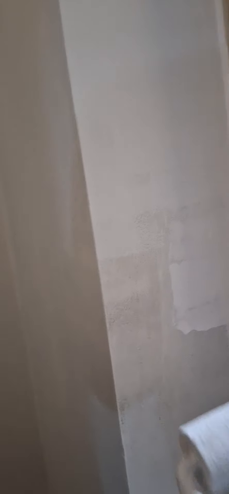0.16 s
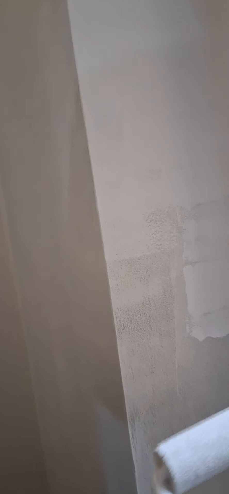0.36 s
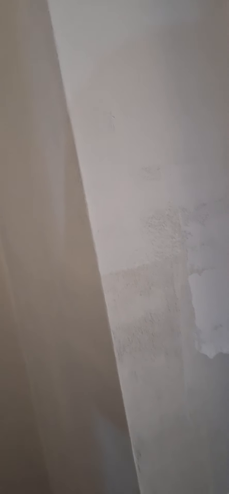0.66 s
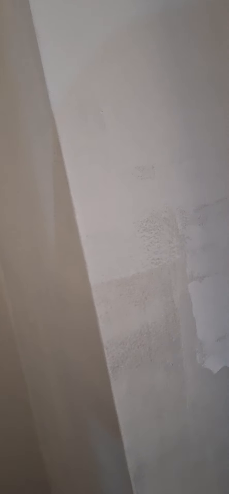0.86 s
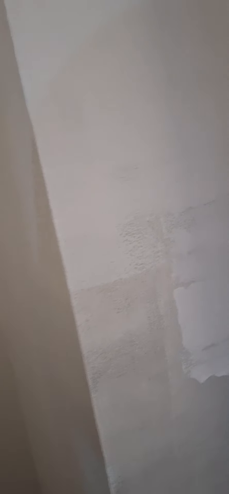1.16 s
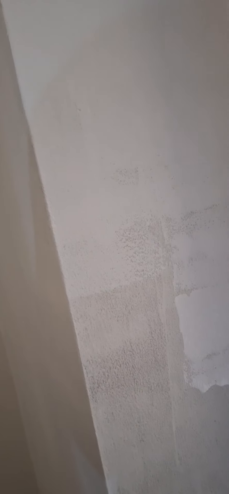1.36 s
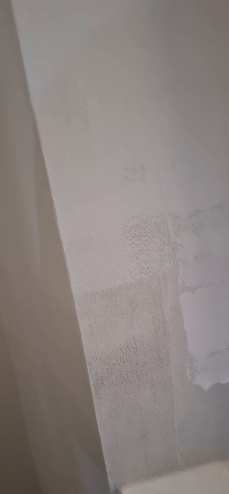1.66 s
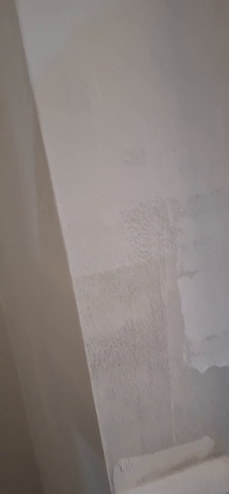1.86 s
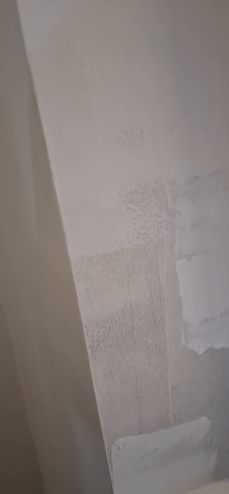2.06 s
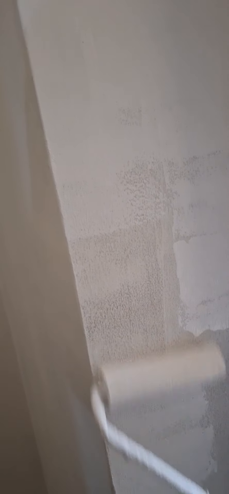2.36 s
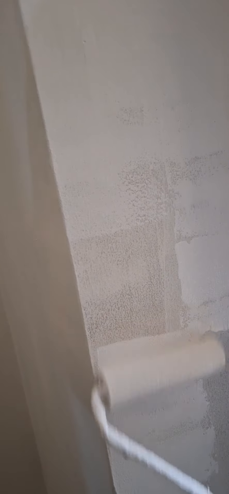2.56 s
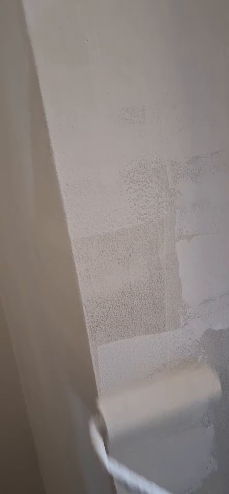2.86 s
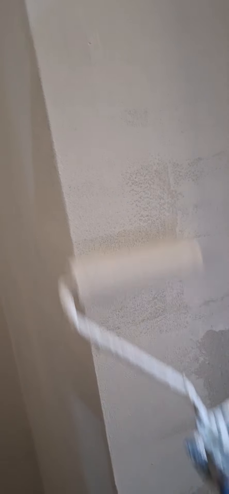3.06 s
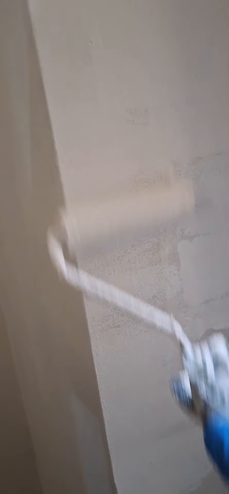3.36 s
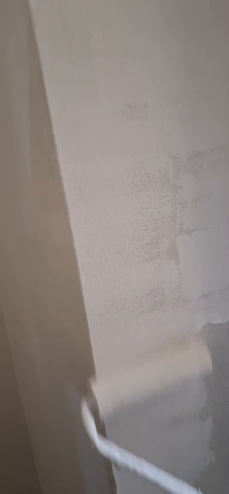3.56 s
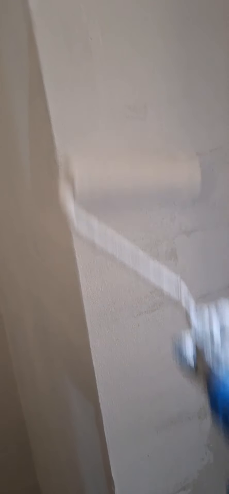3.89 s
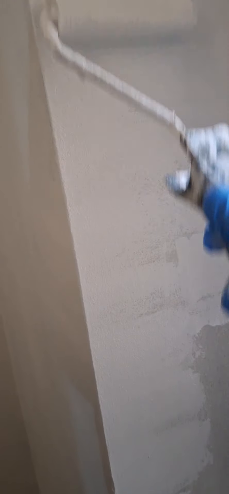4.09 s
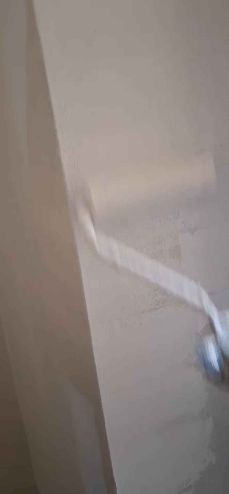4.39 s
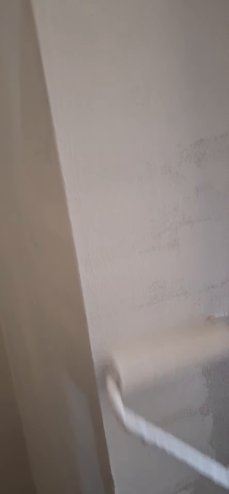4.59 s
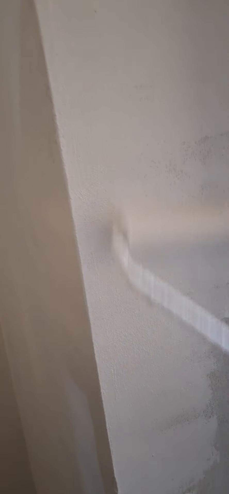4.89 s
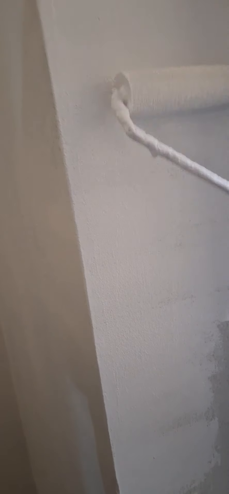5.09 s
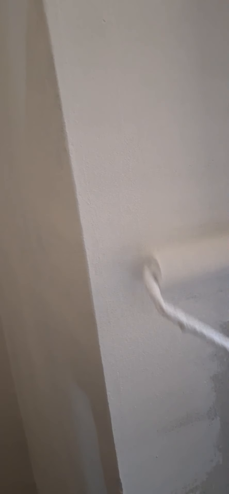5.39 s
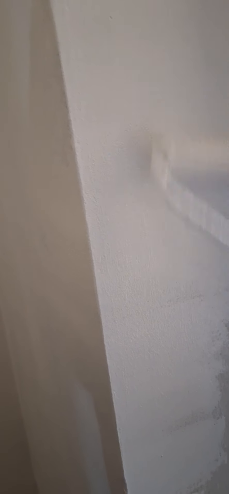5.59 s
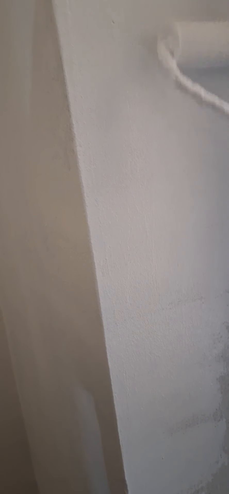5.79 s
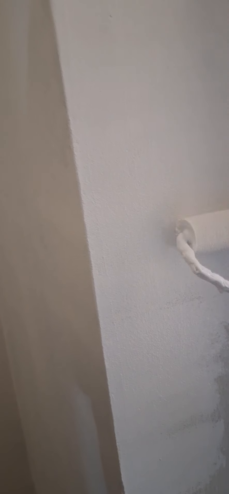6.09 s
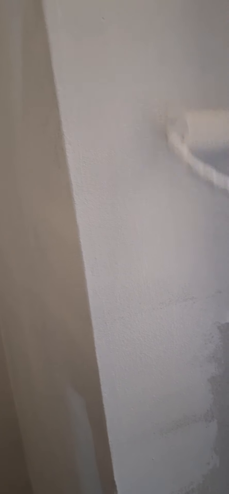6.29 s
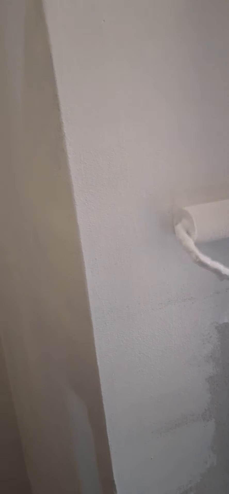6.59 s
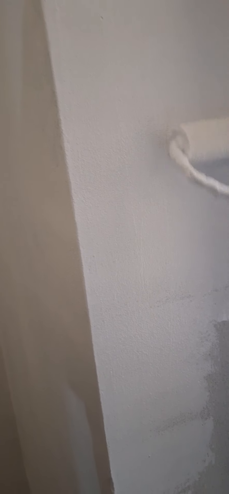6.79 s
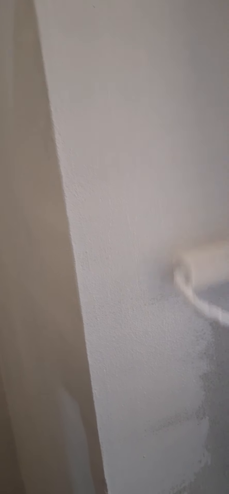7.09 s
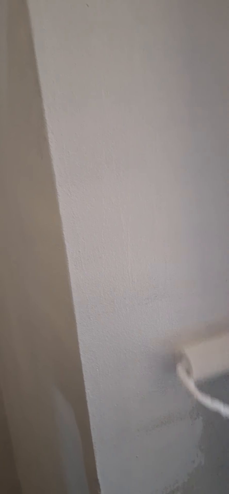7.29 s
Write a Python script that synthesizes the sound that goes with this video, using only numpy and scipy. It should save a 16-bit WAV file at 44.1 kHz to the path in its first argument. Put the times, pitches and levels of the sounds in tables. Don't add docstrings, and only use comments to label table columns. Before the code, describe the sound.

In a bare room, a roller touches a wall, pauses, then rolls back and forth with bright tacky crackling, quick turns and faint low bumps.

```python
import sys
import numpy as np
from scipy import signal
from scipy.fft import rfft, irfft, next_fast_len
from scipy.io import wavfile
from scipy.ndimage import uniform_filter1d, map_coordinates

SR = 44100
rng = np.random.default_rng(int(sys.argv[2]) if len(sys.argv) > 2 else 0)


def gain_from_decibels(decibels):
    exponent = np.asarray(decibels, float) / 20
    return 10 ** exponent


def unload_wav(signal):
    wavfile.write(
        sys.argv[1],
        SR,
        np.round(np.clip(np.atleast_2d(signal).T, -1, 1) * 32767).astype(np.int16),
    )


N = 328545

# (start [s], end [s], snapping level [dB], growth over the pass [dB], dullness [dB])
STROKES = [(1.133, 1.63, -49.5, 16, 2), (1.584, 1.78, -39, -4, 2.5), (1.822, 2.078, -35, 7, 3),
           (2.07, 2.281, -33.5, -3, 0.5), (2.258, 2.518, -33, -11, 0.5), (2.54, 2.802, -32.5, 2, -1),
           (2.801, 2.905, -21.5, -1, -1.5), (2.873, 3.135, -30, -6, 0.7), (3.085, 3.298, -30.5, .6, -2),
           (3.315, 3.678, -28.5, 7, 0), (3.692, 4.196, -28, -8, 1), (4.23, 4.727, -28.5, 1.5, 1.7),
           (4.734, 5.184, -28, -5, 0.5), (5.175, 5.49, -29.5, 2.5, 0.5), (5.498, 5.82, -27.5, -5.5, 0),
           (5.828, 6.167, -29.5, 1, 0.5), (6.16, 6.414, -30.5, -2, 1.5), (6.415, 6.638, -30.5, 9, 1.5),
           (6.648, 6.888, -33.5, -3, 1.5), (6.903, 7.55, -34, -15.5, 1.5)]
# (time [s], level [dB], width [s], extra dullness [dB])
PATCHES = [(1.37, 1, .02, -4), (1.608, 10.5, 0.015, 0.5), (1.646, -3, .015, 0), (1.69, 5, .02, 2),
           (1.954, -2.5, .02, -2.5), (2.006, 4, .025, -2), (2.14, -0.5, 0.011, 3.5), (2.222, -4, 0.018, -1),
           (2.256, 10.5, 0.015, 3), (2.31, 8, 0.018, 2), (2.38, -4.5, 0.028, 2), (2.706, -7.5, 0.017, 5),
           (2.754, 1.5, 0.023, 3.5), (2.966, 2, 0.016, 3.5), (3.06, 3, 0.018, -0.5), (3.132, 6.5, .015, 1),
           (3.262, 4, 0.022, 1.5), (3.51, -7, 0.012, -2), (3.55, 0, 0.054, 1.5), (3.87, -2, 0.027, 0),
           (3.99, -0.5, 0.0098, -4.5), (4.46, 1.5, 0.015, -.6), (4.88, 0.5, .04, 1.5),
           (5.09, -4.5, 0.024, -1.5), (5.366, 2.5, 0.033, 1), (6.008, -2.5, 0.013, 5.5),
           (6.04, 2, .02, -0.5), (6.502, -6, .01, 2), (7.168, -2.5, .025, 3), (7.246, 4, 0.033, 1.2)]
# (time [s], level [dB], attack [s], hold [s], t60 [s])
PEELS = [
    (.49, -34.5, .004, .04, .17),
    (.494, -33, .003, .006, .05),
    (2.124, -29, .0005, .004, .07),
]
# (time [s], right peak [dB])
POPS = [(0.5772, -22), (1.4449, -23.9), (1.5658, -20.5), (1.6097, -15), (1.9012, -17.3), (1.9865, -12.4),
        (2.1245, -5), (2.1471, -9), (2.1712, -12.4), (2.2362, -14.9), (2.3535, -11.7), (2.91, -9),
        (3.1266, -6), (3.1819, -11.9), (3.2614, -16), (3.3989, -10), (4.0851, -9.2), (4.6061, -9),
        (4.8258, -3), (5.417, -7.5), (5.4579, -15), (6.047, -1.5), (6.2123, -12), (6.318, -9.5),
        (6.4934, -9), (6.5329, -7), (6.5441, -5), (6.5923, -12.0), (7.3701, -19), (7.4346, -9)]
# (frequency [Hz], left level [dB], right level [dB])
NAP_COLOUR = [(1500, -12, -12.5), (2450, -17.5, -14.5), (3100, -15, -12), (4360, -14.5, -6),
              (5960, -11.5, -8), (7500, -12, -4.5), (8100, -8, -10.5), (8760, -17.5, -9),
              (10630, -14, -3.5), (12300, -15, 2), (13500, -16, 1.5), (15300, -12, 3), (16000, -15, 0.5)]
# (time [s], level [dB])
LEFT_REACH = [(0, -14), (1.4, -.6), (1.75, -2.5), (2.3, -2), (3.0, -0.7), (3.7, -0.3), (4.2, 0.5),
              (4.7, -1), (5.1, 1.5), (5.3, -1.5), (5.75, 2), (5.95, -1.8), (6.35, 2.5), (6.6, -1),
              (6.85, 1), (7.45, -4)]
# (level [dB], t60 [s], centre [Hz])
FIRST_TOUCH = (-30, .22, 2000)
# (time [s], level [dB])
RUMBLE = [(0.0, -40.5), (0.48, -41), (0.5, -34), (1.26, -44), (1.33, -35), (1.41, -47), (1.47, -38.5),
          (4.71, -37), (5.44, -33), (5.56, -40), (5.79, -29), (5.83, -34.5), (6.25, -37.5), (6.33, -36),
          (6.37, -34.5), (6.79, -38.5), (7.22, -31.5), (7.45, -36.5)]
# (frequency [Hz], width [Hz], level [dB])
WALL_MODES = [(56.7, 16, -3.5), (92, 23.4, -4.5), (112.5, 21.6, -1.5), (180.7, 12.4, -7.5),
              (203.6, 12.4, -6)]
# (time [s], peak [dB], t60 [s])
THUDS = [(0.502, -28, .15), (1.999, -22.5, 0.22), (3.449, -24, .15), (4.914, -20, 0.12), (5.065, -19, 0.12),
         (5.299, -21, 0.28), (5.741, -20, 0.25), (6.297, -18, 0.2), (6.667, -19.5, 0.16),
         (7.118, -18, 0.18), (7.229, -36, 0.15)]
# (time [s], level [dB])
AIR_LEVEL = [(0.0, -40), (0.6, -40), (0.95, -40), (2.2, -39.5), (2.45, -40), (3.88, -39), (4.19, -41.5),
             (4.48, -40.5), (6.66, -40), (7.45, -39)]
# (frequency [Hz], left level [dB], right level [dB])
AIR_COLOUR = [(240, -2, 0), (303, 1.5, -9.5), (400, -3.5, -2), (714, -1.5, -3.5), (1065, -2, -3.5),
              (1380, -5.5, -6.5), (1800, -6.5, -4.5), (2600, -7, -5.5), (4500, -11, -7),
              (7660, -12.5, -11.5), (8800, -18, -18.5), (10500, -23, -13.5), (12500, -24, -10.5),
              (15700, -26.5, -15.5)]
# (frequency [Hz], left-right likeness [-1..1])
AIR_LIKENESS = [(200, 0.71), (330, 1), (640, 0.28), (1200, -0.044)]
# (frequency [Hz], width [Hz], left lift [dB], right lift [dB])
ROOM_MODES = [(403.6, 40, 5, 4), (458, 44, 1.5, 2), (553, 21, 1.5, 3), (670, 13, 1, 6.5),
              (1618, 43, 5.5, 2), (1819, 31, 6.5, 3.5), (2006, 56, 6.5, 2), (1680, 40, 1.5, 0)]


def roller():
    bright_db, dull_db, left_db = rolling()
    snaps = patchy(threads(share=0.25, spread_db=1.8), depth_db=1.36)

    def nap(hz):
        low_cut = 1 + (1400 / (hz + 1)) ** 4
        high_cut = 1 + (hz / 16000) ** 30
        return causal(gain_from_decibels(along(NAP_COLOUR, hz)) / low_cut / high_cut)

    def upper(hz):
        return 1 / (1 + (8700 / (hz + 1)) ** 12)

    bright = filtered(snaps, lambda hz: nap(hz) * upper(hz))
    dull = filtered(snaps, lambda hz: nap(hz) * (1 - upper(hz)))
    uneven = gain_from_decibels(0.84 * wobble(45) + 0.54 * wobble(250))
    level = gain_from_decibels(bright_db + 8.0) / np.std(bright[1])
    sizzle = uneven * level * (bright + gain_from_decibels(dull_db + 7.0) * dull)
    sizzle = sizzle * gain_from_decibels([left_db, 0 * left_db])
    return sizzle + big_threads(nap)


def big_threads(nap):
    s, peak_db = np.transpose(POPS)
    pops = np.bincount(np.round(s * SR).astype(int), gain_from_decibels(peak_db + 5), N)

    def ring(hz):
        damping = 1j * hz * 1800
        return 0.86 + damping / (13500 ** 2 - hz * hz + damping)

    return filtered(pops, lambda hz: nap(hz) * ring(hz) * gain_from_decibels([[-3], [0]]))


def rolling():
    speed_up_s, slow_down_s, creep = 0.098, 0.077, 0.28
    full_db, base_dull_db, duller_per_db = -29.5, -6.5, 0.3485
    t = np.arange(N) / SR
    power = sum(peel(t, *row) ** 2 for row in PEELS) + 1e-8
    dullness = np.zeros(N)
    for start, end, db, growth_db, dull_db in STROKES:
        now = slice(round(start * SR), round(end * SR))
        since, left = t[now] - start, end - t[now]
        speed = np.tanh(creep + since / speed_up_s) * np.tanh(creep + left / slow_down_s)
        pass_db = db + growth_db * (since / (end - start) - 0.5)
        power[now] += (gain_from_decibels(pass_db) * np.abs(speed) ** 2.2) ** 2
        dullness[now] = dull_db
    level_db = 10 * np.log10(uniform_filter1d(power, size=44))
    extra_dull_db = np.zeros(N)
    for s, db, width, dull_db in PATCHES:
        bump = np.exp(-0.5 * ((t - s) / width) ** 2)
        level_db = level_db + db * bump
        extra_dull_db += dull_db * bump
    dull_db = base_dull_db + uniform_filter1d(dullness, size=900) + extra_dull_db
    dull_db = dull_db - duller_per_db * (level_db - full_db)
    return level_db, dull_db, curves(LEFT_REACH)[0]


def peel(t, start, db, attack, hold, t60):
    since = np.clip(t - start, 0, None)
    release_db = -60 * np.clip(since - hold, 0, None) / t60
    return gain_from_decibels(db + release_db) * (1 - np.exp(-(since / attack) ** 2))


def threads(share, spread_db):
    chance, size, sign = rng.random((3, 2, N))
    snaps = (chance < share) * np.sign(sign - 0.5) * gain_from_decibels(-spread_db * np.log(size + 4e-3))
    return unit(snaps)


def patchy(x, depth_db):
    z = signal.stft(x, nperseg=256)[2]
    field = rng.standard_normal(z.shape[1:])
    field = uniform_filter1d(field, size=6, axis=0)
    field = uniform_filter1d(field, size=9, axis=1)
    return signal.istft(z * gain_from_decibels(depth_db * field / np.std(field)), nperseg=256)[1][:, :N]


def touch():
    db, t60, centre_hz = FIRST_TOUCH
    t = np.clip(np.arange(N) / SR - 0.491, 0, None)

    def band(hz):
        return (hz / centre_hz) ** 2 / (1 + (hz / centre_hz) ** 4)

    squelch = unit(filtered(threads(share=0.22, spread_db=-3.0), band))
    attack = 1 - np.exp(-t / 0.0043)
    return gain_from_decibels(db - 60 * t / t60) * attack * squelch * gain_from_decibels([[-3], [0]])


def wall():
    def body(hz):
        modes = 0
        for k, (centre, width, db) in enumerate(WALL_MODES):
            damping = 1j * hz * width
            modes = modes + (-1) ** k * gain_from_decibels(db) * damping / (centre * centre - hz * hz + damping)
        return modes / (1 + (32 / (hz + 1)) ** 4) / (1 + (hz / 230) ** 6)

    shake = filtered(alike_noise(lambda hz: np.where(hz < 140, 0.99, 0.96)), body)
    low = filtered(shake, lambda hz: 1 / (1 + (hz / 145) ** 12))
    low_db, = curves(RUMBLE)
    upper_db = -5.5 + (0.63 - 1) * (low_db - low_db.mean())
    rumble = gain_from_decibels(low_db - 1.0) * (unit(low) + gain_from_decibels(upper_db - 0.66) * unit(shake - low))
    port_db = [(30, 3.2, -5.0), (200, 0.41, -1.0)]  # (frequency [Hz], left [dB], right [dB])
    return filtered(rumble + thuds(), lambda hz: gain_from_decibels(along(port_db, hz)))


def thuds():
    out, t = np.zeros(N + SR), np.arange(SR // 2) / SR
    swell = 1 - np.exp(-t / 0.011)
    tone = swell * np.sin(2 * np.pi * 113 * t)
    for s, db, t60 in THUDS:
        out[round(s * SR):][:len(t)] += gain_from_decibels(db - 60 * t / t60) * tone
    return out[:N]


def air():
    def colour(hz):
        level_db = along(AIR_COLOUR, hz)
        for centre, width, *lift_db in ROOM_MODES:
            level_db = level_db + np.outer(lift_db, 1 / (1 + ((hz - centre) * 2 / width) ** 2))
        return gain_from_decibels(level_db) / (1 + (150 / (hz + 1)) ** 4)

    wash = filtered(alike_noise(lambda hz: along(AIR_LIKENESS, hz)[0]), colour)
    return gain_from_decibels(6.0 + curves(AIR_LEVEL)[0]) * wash / np.std(wash)


def alike_noise(likeness):
    def mid_side(hz):
        turn = np.arccos(np.clip(likeness(hz), -1, 1)) / 2
        return np.array([np.cos(turn), np.sin(turn)])

    mid, side = filtered(rng.standard_normal((2, N)), mid_side)
    return np.array([mid + side, mid - side])


def unit(x):
    return x / np.sqrt(np.mean(x ** 2, axis=-1, keepdims=True) + 1e-20)


def along(points, hz):
    f, *cols = np.transpose(points)
    return np.array([np.interp(np.log(hz + 1), np.log(f + 1), c) for c in cols])


def curves(rows):
    s, *cols = np.transpose(rows)
    return [np.interp(np.arange(N) / SR, s, c) for c in cols]


def wobble(rate):
    knots = rng.standard_normal(int(N * rate / SR) + 4)
    return map_coordinates(knots, [np.arange(N) * rate / SR])


def filtered(x, response):
    m = next_fast_len(N + SR // 2)
    return irfft(rfft(x, m) * response(np.fft.rfftfreq(m, 1 / SR)), m)[..., :N]


def causal(gain):
    cepstrum = irfft(np.log(gain + 1e-6))
    length = cepstrum.shape[-1]
    fold = np.sign(length // 2 - np.arange(length)) + 1
    fold[0] = 1
    return np.exp(rfft(cepstrum * fold))


def scene():
    left, right = wall()
    return roller() + touch() + air() + [np.roll(left, -7), right]


def low_pass(x):
    return signal.sosfilt(signal.butter(12, 17070, fs=SR, output="sos"), x)


def record(dry):
    mix = filtered(dry, lambda hz: hz < 15750)
    return low_pass(mix)


dry = scene()
out = record(dry)
unload_wav(out)
```